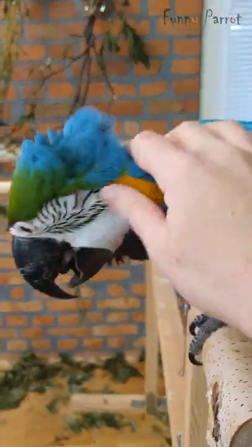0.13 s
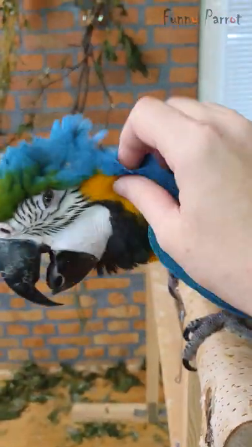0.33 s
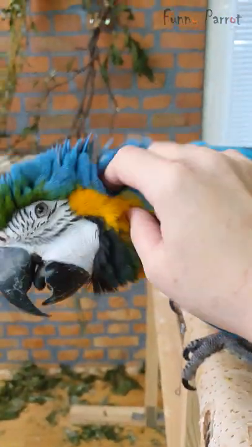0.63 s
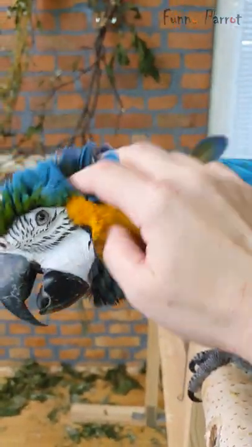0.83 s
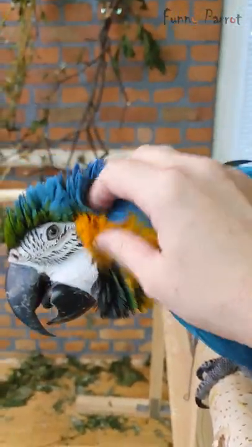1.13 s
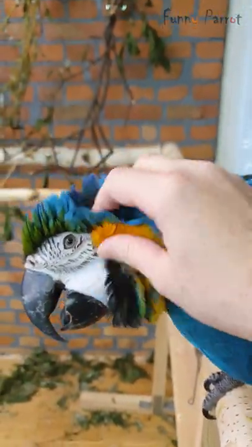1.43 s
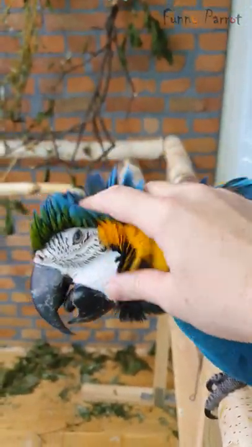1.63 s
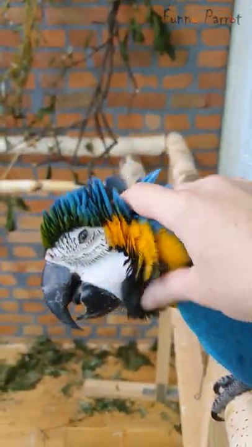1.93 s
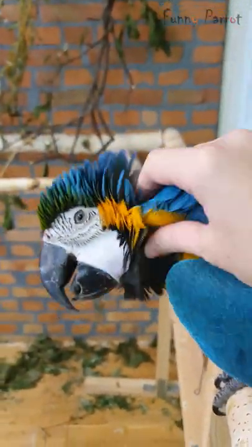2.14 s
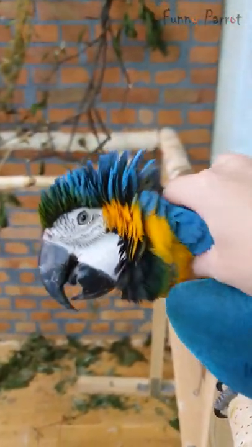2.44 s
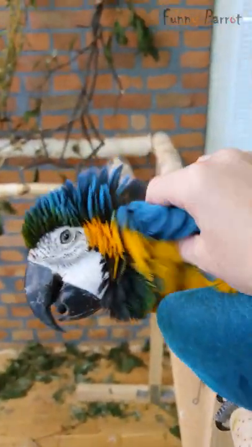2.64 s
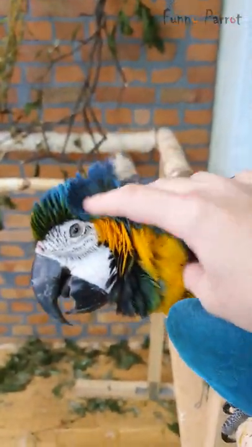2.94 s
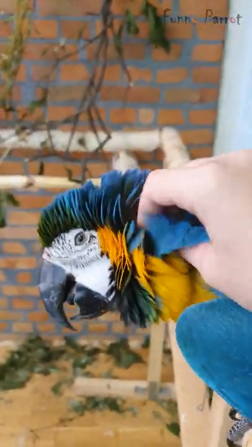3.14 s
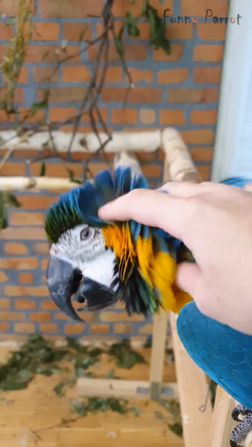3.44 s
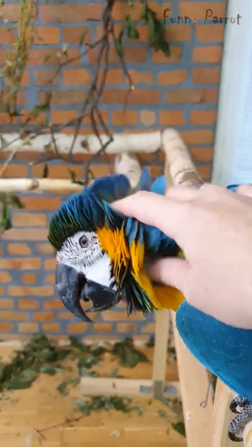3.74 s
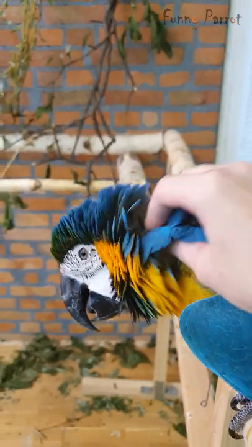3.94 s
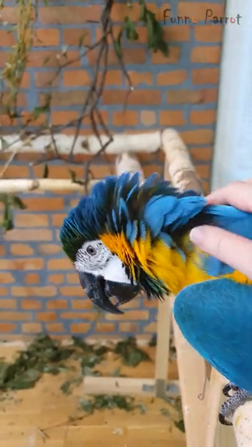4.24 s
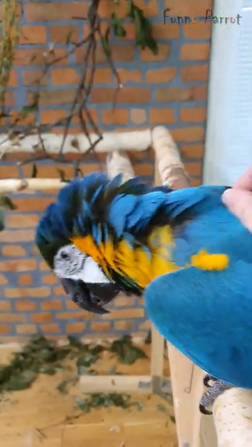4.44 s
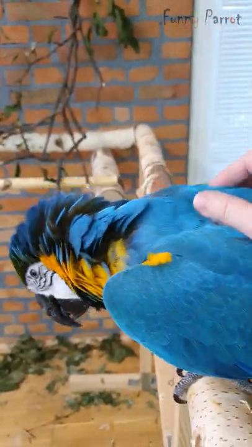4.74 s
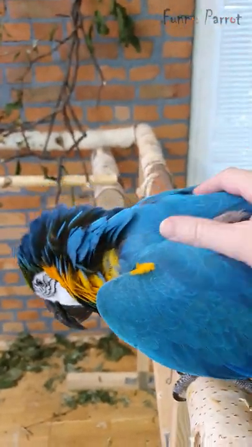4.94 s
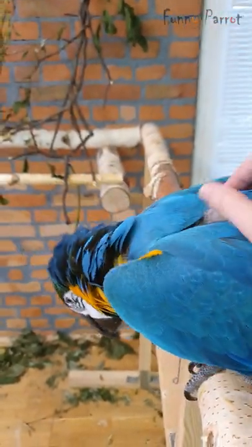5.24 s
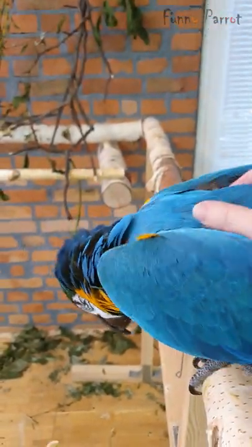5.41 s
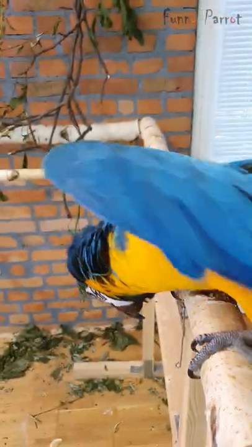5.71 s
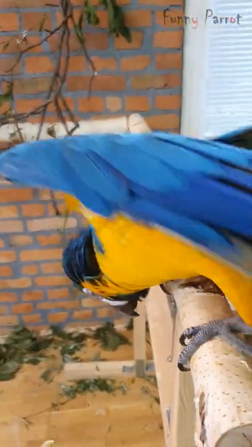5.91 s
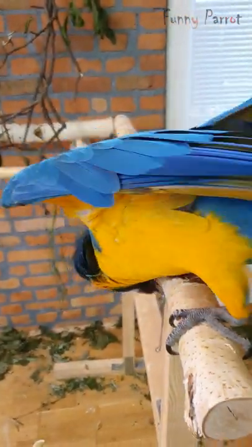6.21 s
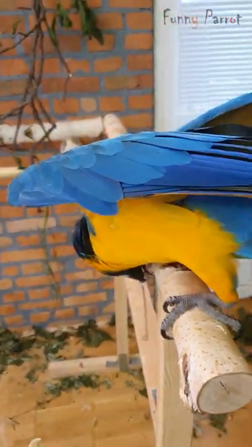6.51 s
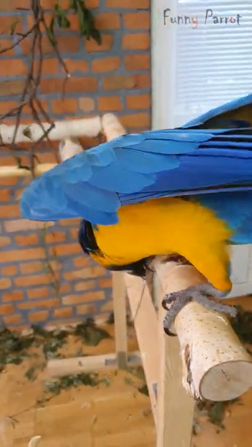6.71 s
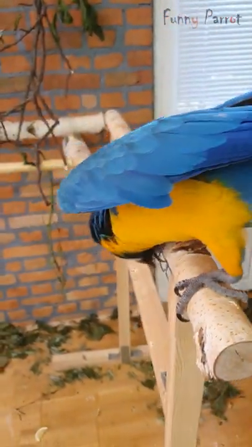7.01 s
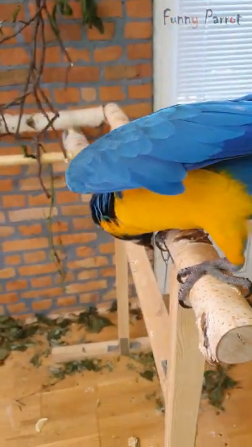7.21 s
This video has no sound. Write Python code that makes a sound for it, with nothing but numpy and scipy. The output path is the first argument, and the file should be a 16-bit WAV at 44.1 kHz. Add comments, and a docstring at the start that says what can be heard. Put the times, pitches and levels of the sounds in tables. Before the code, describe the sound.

Faint feather rubbing in a humming room, one short loud parrot squawk, then wing rustling, dry quill ticks and a brief rasp.

```python
"""Scratching a macaw's neck

Fingers rub a macaw's feathers in a brick-walled room where an appliance hums. The bird's voice box
gives one whistling squawk. It lifts a wing, whose long feathers rustle past each other, and ends on
a short hoarse rasp of air through its throat. Quills tick, beak and claws tap softly, and there is
a dull bump with a low rumble."""
import sys
import numpy as np
from scipy import signal
from scipy.fft import rfft, irfft, next_fast_len
from scipy.io import wavfile
from scipy.ndimage import uniform_filter1d, map_coordinates

SR = 44100
rng = np.random.default_rng(int(sys.argv[2]) if len(sys.argv) > 2 else 0)


def persist_wave(psi):
    """Save psi, clipped to +-1, as 16-bit WAV."""
    counts = np.round(np.clip(psi, -1, 1) * 32767).astype(np.int16)
    wavfile.write(sys.argv[1], SR, np.atleast_2d(counts).T)


N = 324576
TIME_S = np.arange(N) / SR

# tone colour of back feathers, also used for flicks of the wing: frequency_hz, level_db
FEATHER_COLOUR = [(500, -14), (1200, -6), (2200, 3.5), (2900, -2), (4100, 4.5), (6000, -6), (9000, -5),
                  (12000, -8), (16000, -9.5)]


def amp(db):
    """Turn decibels into a gain."""
    return 10 ** (np.asarray(db) / 20)


def unit(x):
    """Scale a signal to an average power of 1."""
    return x / np.sqrt(np.mean(x ** 2) + 1e-20)


def along(points, hz):
    """Read between (frequency_hz, value) points, with octaves evenly spaced."""
    points_hz, values = np.transpose(points)
    return np.interp(np.log(hz + 1), np.log(points_hz + 1), values)


def curve(rows):
    """Join (time_s, value) points with straight lines."""
    return np.interp(TIME_S, *np.transpose(rows))


def during(rows):
    """1 from a table's first time to its last, 0 outside, with soft edges."""
    inside = (TIME_S >= rows[0][0]) & (TIME_S <= rows[-1][0])
    return uniform_filter1d(1. * inside, size=400)


def switch(at_s, ease_s):
    """A smooth step from 0 to 1."""
    return .5 + .5 * np.tanh((TIME_S - at_s) / (2 * ease_s))


def held(start_s, length_s, attack_s, sag_db_per_s, release_db_per_s):
    """A level that rises, sags while it is held, then dies away."""
    t = np.maximum(TIME_S - start_s, 0)
    drop_db = sag_db_per_s * t + release_db_per_s * np.maximum(t - length_s, 0)
    return np.minimum(t / attack_s, 1) ** 2 * amp(-drop_db)


def wobble(rate_hz):
    """A smooth random curve with rate_hz new values a second."""
    values = rng.standard_normal(int(N * rate_hz / SR) + 4)
    return map_coordinates(values, [np.arange(N) * rate_hz / SR])


def phase_of(pitch_hz):
    """The running angle of a wave whose pitch changes."""
    return 2 * np.pi * np.cumsum(pitch_hz) / SR


def add(track, start_s, sound):
    """Mix a sound into a track."""
    part = track[..., round(start_s * SR):][..., :sound.shape[-1]]
    part += sound[..., :part.shape[-1]]


def filtered(x, response):
    """Scale each frequency f in a signal by response(f)."""
    size = next_fast_len(N + SR // 2)
    return irfft(rfft(x, size) * response(np.fft.rfftfreq(size, 1 / SR)), size)[..., :N]


def resonance(f, hz, width_hz):
    """A filter peak of height 1 that favours frequencies near hz."""
    return 1j * f * width_hz / (hz * hz - f * f + 1j * f * width_hz)


def resonant_noise(peaks, flutter_db, flutter_hz):
    """Fluttering noise through (centre_hz, width_hz, level_db) peaks, cut below the lowest."""
    def response(f):
        body = sum((-1) ** k * amp(db) * resonance(f, hz, width)
                   for k, (hz, width, db) in enumerate(peaks))
        return body / (1 + (.8 * peaks[0][0] / (f + 1)) ** 10)
    noise = rng.standard_normal(N) * amp(flutter_db * wobble(flutter_hz))
    return unit(filtered(noise, response))


def spread(pair, gain):
    """Colour two unrelated signals and mix them to stereo, with both sides alike in the bass."""
    # how alike left and right are: frequency_hz, likeness (1 = the same)
    likeness = [(100, 0.94), (350, 0.8), (700, 0.37), (1500, 0.27), (3000, 0.016), (12000, 0.044)]
    angle = lambda f: np.arccos(np.clip(along(likeness, f), -1, 1)) / 2
    mid, side = filtered(pair, lambda f: gain(f) * np.array([np.cos(angle(f)), np.sin(angle(f))]))
    return unit(np.array([mid + side, mid - side]))


def room(x, echo_db, ring=1):
    """Blend a sound with its echo off the hard walls; ring scales the echo's length."""
    # time the echo takes to fall 60 dB at ring=1: frequency_hz, fade_s
    echo_fade = [(200, .45), (1000, .52), (1900, .62), (3600, .72), (6000, .5), (12000, .35)]
    hz, t, noise = signal.stft(rng.standard_normal((2, SR)), SR, nperseg=256)
    fade = amp(-60 * t / (ring * along(echo_fade, hz)[:, None]))
    tail = signal.istft(noise * fade, SR, nperseg=256)[1]
    tail = np.pad(tail / np.linalg.norm(tail[0]), ((0, 0), (SR // 200, 0)))  # arrives 5 ms late
    echo = signal.fftconvolve(x[None], tail, axes=1)[:, :N]
    return (x + amp(echo_db) * echo) / np.hypot(1, amp(echo_db))


def hum_and_air():
    """An appliance hums, slightly unsteady, over the low rush of room air."""
    # the appliance's tones: pitch_hz, level_db
    hum_tones = [(80.7, -72), (118.4, -64), (199.2, -80.5), (301.5, -80), (355.3, -67), (441.4, -76)]
    # tone colour of the air: frequency_hz, level_db
    air_colour = [(18, -45), (30, -29), (109, -2.5), (245, -11.5), (355, -4.5), (404, -15.5), (449, -14.5),
                  (554, -25), (844, -26.5), (1040, -36), (1760, -30.5), (2120, -38), (6380, -35.5),
                  (11400, -42), (16000, -68)]
    hum = sum(amp(db + 1.74 * wobble(9.6)) * unit(np.sin(phase_of(hz + 2.5 * wobble(20))))
              for hz, db in hum_tones)
    air = spread(rng.standard_normal((2, N)), lambda f: amp(along(air_colour, f)))
    return amp(0.5) * hum + amp(-63) * air


def rumble():
    """A deep, wavering tone and its octave come and go."""
    # spells of rumble: start_s, length_s, level_db
    spells = [(0.697, 0.14, -67), (1.16, 0.062, -70), (2.41, .1, -64), (3.092, 0.12, -40.5),
              (3.245, 0.19, -51), (3.412, 0.28, -49), (3.766, 0.26, -56), (4.13, .35, -71.5),
              (5.371, .1, -53), (5.66, .14, -57.5)]
    swell = sum(amp(db) * held(start, length, attack_s=0.049, sag_db_per_s=11.5, release_db_per_s=229)
                for start, length, db in spells)
    phase = phase_of(pitch_hz=41.5 + 2 * wobble(10))
    tone = unit(np.sin(phase) + amp(-14.5 + 2.7 * wobble(9.9)) * np.sin(2 * phase))
    floor = amp(-82 + 4 * wobble(8))
    return np.hypot(swell, floor) * tone  # hypot adds two levels by their power


def bump():
    """A dull, scraping bump swells and fades."""
    # its rise and fall: time_s, level_db
    loudness = [(3.085, -68), (3.11, -58), (3.15, -51), (3.175, -57.5), (3.2, -62), (3.24, -66), (3.3, -77)]
    # its resonances: centre_hz, width_hz, level_db
    peaks = [(197, 14, -1), (520, 45, -9.5), (623, 73, -19), (840, 50, -24)]
    scrape = resonant_noise(peaks, flutter_db=0.5, flutter_hz=44)
    return amp(curve(loudness)) * during(loudness) * scrape


def contacts(rows, attack_s, ring_s, crack_db, crack_s):
    """Each contact is a brief ring and a tiny crack, falling 60 dB in ring_s and crack_s."""
    track, t = np.zeros(N), np.arange(SR // 10) / SR
    for start_s, db, hz in rows:
        ring = np.sin(2 * np.pi * hz * t) * amp(-60 * t / ring_s)
        crack = amp(crack_db - 60 * t / crack_s) * rng.standard_normal(len(t))
        hit = (ring + crack) * (1 - np.exp(-t / attack_s))
        add(track, start_s, amp(db) * hit / np.abs(hit).max())
    return track


def quill_ticks():
    """Quills tick, high and dry."""
    # each tick: start_s, strength_db, pitch_hz
    hits = [(4.798, -34, 7150), (5.763, -37, 4530), (6.1185, -32, 3950), (6.1862, -25.5, 3970),
            (6.2203, -34, 2620), (6.4089, -26.5, 3830), (6.48, -27, 3830), (6.4865, -25, 2980),
            (6.6667, -33, 3200), (6.6996, -28, 3500), (6.7753, -27.5, 3530), (6.8266, -39, 4800),
            (6.9236, -22.5, 3980), (7.003, -31, 3660), (7.0554, -42, 5940), (7.0848, -29.5, 3790),
            (7.1576, -45, 3450), (7.3115, -54, 6540)]
    ticks = contacts(hits, attack_s=0.00041, ring_s=0.0026, crack_db=-8, crack_s=0.0028)
    ticks = filtered(ticks, lambda f: resonance(f, 3370, 4500) ** 2)
    return room(ticks, echo_db=-10)


def beak_and_claw_taps():
    """Beak and claws knock softly, lower than the quills and with more echo."""
    # each tap: start_s, strength_db, pitch_hz
    hits = [(0.242, -44.5, 800), (2.04, -35, 910), (2.589, -40, 880), (3.235, -43, 980), (3.816, -51, 890),
            (4.995, -51.5, 873), (6.488, -26.5, 820), (6.519, -30, 756), (6.754, -37, 825),
            (6.798, -40, 826)]
    taps = contacts(hits, attack_s=0.00052, ring_s=0.019, crack_db=2.5, crack_s=0.014)
    taps = filtered(taps, lambda f: resonance(f, 950, 2100) ** 3)
    return room(taps, echo_db=1.5, ring=0.52)


def barbs(colour, low_hz, high_hz, clicks_per_s, click_db, clump_db):
    """A feather's tiny branches slip past each other: clumps of fine clicks on a smooth swish."""
    clicks = (rng.random(N) < clicks_per_s / SR) * rng.standard_normal((2, N))
    swish = rng.standard_normal((2, N))
    pair = (swish + amp(click_db) * unit(clicks)) * amp(clump_db * wobble(90))
    band = lambda f: 1 / np.sqrt((1 + (low_hz / (f + 1)) ** 8) * (1 + (f / high_hz) ** 8))
    return spread(pair, lambda f: amp(along(colour, f)) * band(f))


def rubs(rows):
    """Each rub swells, then fades more slowly. Gives one gain curve for each level column."""
    roundness, fade_ratio = 1.67, 1.32
    power = np.zeros((len(rows[0]) - 2, N))
    for peak_s, length_s, *levels_db in rows:
        start_s = max(peak_s - 2 * length_s, 0)
        t = np.arange(start_s, peak_s + 2 * length_s * fade_ratio, 1 / SR)
        from_peak = 2 * (t - peak_s) / length_s
        shape = .5 ** (np.maximum(-from_peak, from_peak / fade_ratio) ** roundness)
        add(power, start_s, (amp(levels_db)[:, None] * shape) ** 2)
    return np.sqrt(power)


def neck_scratches():
    """Fingers work through the soft neck feathers, rubbing faintly between scratches."""
    # tone colour of neck feathers: frequency_hz, level_db
    colour = [(350, -32), (600, -4), (894, -4), (1680, -0.5), (1830, -2.5), (2240, -1.5), (3300, -7),
              (7110, -5.5), (8050, -13.5), (11300, -8.5), (16000, -23)]
    # each scratch: peak_s, length_s, swish_db, crisp_db
    scratches = [(.25, 0.093, -74, -76), (.54, 0.099, -74.5, -75.5), (.66, 0.18, -78, -78.5),
                 (.86, .07, -77, -78), (.97, .08, -79, -80), (1.115, .03, -74, -77),
                 (1.195, 0.056, -75.5, -73.5), (1.41, 0.12, -71, -75), (1.57, 0.11, -77.5, -80),
                 (1.77, 0.059, -72, -73), (1.89, 0.072, -74, -73), (1.97, 0.058, -68, -67),
                 (2.05, 0.054, -64.5, -68.5), (2.14, 0.11, -75, -75), (2.277, 0.028, -59, -55.5),
                 (2.32, 0.093, -57.5, -59), (2.6, 0.39, -73, -76), (2.84, 0.18, -74, -79),
                 (3.055, 0.07, -70, -73), (3.14, 0.095, -69.5, -92), (3.35, 0.071, -74.5, -73),
                 (3.51, 0.06, -82, -76.5), (3.765, 0.045, -77.5, -68), (3.88, 0.17, -79, -82),
                 (4.035, 0.048, -78, -72.5)]
    swish_gain, crisp_gain = rubs(scratches)
    fidget = amp(1.5 * wobble(7.5)) * (TIME_S < 4.1)  # until the hand leaves the neck
    swish = barbs(colour, 710, 5100, clicks_per_s=1100, click_db=-8, clump_db=1.5)
    crisp = barbs(colour, 5200, 17000, clicks_per_s=470, click_db=-2, clump_db=2)
    swish *= np.hypot(swish_gain, amp(-86) * fidget)
    crisp *= np.hypot(crisp_gain, amp(-92) * fidget)
    return swish + crisp


def back_strokes():
    """The fingers slide down the feathers of the back."""
    # each stroke: peak_s, length_s, level_db
    strokes = [(4.403, .06, -42), (4.53, 0.1, -47.5), (4.735, 0.052, -55.5), (4.795, 0.053, -52.5),
               (4.935, 0.088, -59), (5.09, .05, -63), (5.17, 0.072, -54.5), (5.315, 0.084, -59),
               (5.49, 0.16, -63)]
    swish = barbs(FEATHER_COLOUR, 470, 16000, clicks_per_s=1500, click_db=-2.5, clump_db=0)
    return rubs(strokes) * swish


def wing_rustle():
    """The long flight feathers fan out and rub while the wing is up, harder with each sweep."""
    # tone colour of wing feathers: frequency_hz, level_db
    colour = [(400, -17), (600, -15.5), (800, -10.5), (1150, -10.5), (1600, -4), (2100, 1.5), (2900, 0),
              (3900, 1.5), (5000, -2), (7000, -8), (8500, -12), (9800, -13), (11400, -12), (16000, -20.5)]
    # each sweep of the wing: peak_s, length_s, flap_db, swish_db, crisp_db
    sweeps = [(5.615, 0.065, -61.5, -47, -46), (5.73, 0.13, -58.5, -67, -55.5),
              (5.875, 0.12, -48, -46.5, -47), (6.015, 0.088, -55.5, -51.5, -53.5),
              (6.18, 0.13, -80, -48.5, -48.5), (6.255, .09, -67, -43, -45.5), (6.34, .12, -64, -41, -48),
              (6.51, 0.077, -57.5, -42.5, -50.5), (6.59, 0.055, -65, -52, -54.5),
              (6.69, 0.065, -59, -50, -55.5)]
    # stiff feathers flicking past each other: peak_s, level_db, width_s, centre_hz
    flicks = [(5.85, -43.5, 0.015, 1880), (5.888, -38.5, 0.009, 5980), (5.89, -39, 0.013, 1630),
              (5.908, -41.5, 0.0083, 3870), (6.246, -41.5, 0.021, 1900)]
    lifted = held(start_s=5.545, length_s=1.174, attack_s=0.063, sag_db_per_s=0, release_db_per_s=68)
    # the crisp top comes and goes faster than the flap and swish
    steady = [amp(-68.5) * lifted, amp(-48.5) * lifted, amp(-53) * lifted ** 2.4]
    flap, swish, crisp = np.hypot(rubs(sweeps), steady)
    rustle = flap * barbs(colour, 400, 1410, clicks_per_s=300, click_db=-6, clump_db=0.5)
    rustle += swish * barbs(colour, 1130, 7000, clicks_per_s=290, click_db=-8.5, clump_db=0.95)
    rustle += crisp * barbs(colour, 7000, 18720, clicks_per_s=680, click_db=-4.5, clump_db=1.5)
    for peak_s, db, width_s, hz in flicks:
        swell = amp(db) * np.exp(-.5 * ((TIME_S - peak_s) / width_s) ** 2)
        octave = hz / np.sqrt(2), hz * np.sqrt(2)
        rustle += swell * barbs(FEATHER_COLOUR, *octave, clicks_per_s=1600, click_db=1.5, clump_db=1)
    return rustle * amp([[-.3], [.3]])


def rasp():
    """Air churns through the bird's throat in a hoarse burst that dulls as it fades."""
    # throat resonances: centre_hz, width_hz, level_db
    throat_peaks = [(2113, 186, 5), (2900, 620, -3.5), (3690, 180, 0), (3896, 124, 2), (4720, 550, -3),
                    (5320, 320, -2.5), (7070, 1300, -9.5)]
    # the deep throat tone's resonances: centre_hz, width_hz, level_db
    deep_peaks = [(1220, 69, -19.5), (1390, 76, 18.5)]
    # when that deep tone breaks through: start_s, length_s, level_db
    deep_pulses = [(6.872, .058, -39.5), (6.975, .06, -49)]
    start_s, length_s, attack_s = 6.846, 0.22, .02
    force = amp(-31) * held(start_s, length_s, attack_s, sag_db_per_s=104, release_db_per_s=227)
    upper = resonant_noise(throat_peaks, flutter_db=1.5, flutter_hz=400)
    upper = filtered(upper, lambda f: 1 / (1 + (f / 12000) ** 6))
    dull = filtered(upper, lambda f: 1 / (1 + (f / 5970) ** 8))
    treble = (upper - dull) * amp(-35 * np.maximum(TIME_S - start_s, 0))  # dies first
    deep = resonant_noise(deep_peaks, flutter_db=2, flutter_hz=180)
    pulses = sum(amp(db) * held(start, length, attack_s, sag_db_per_s=26, release_db_per_s=600)
                 for start, length, db in deep_pulses)
    puff = amp(-19.5) * resonant_noise([(656, 860, 0)], flutter_db=6, flutter_hz=170)
    voice = force * (dull + treble + puff) + np.hypot(pulses, amp(-19) * force) * deep
    return room(voice, echo_db=2, ring=.55)


def diffuse_echo(voice, start_s, end_s, echo_db):
    """Each stretch of the call gets its own echo, blending into a smooth, diffuse tail."""
    times_s = np.linspace(start_s, end_s, 7)
    return sum(room(voice * np.interp(TIME_S, times_s, share), echo_db) for share in np.eye(7))


def squawk():
    """The voice box whistles a note and its octave, brighter with effort and as the beak opens."""
    # the pitch dips, swoops up and settles: time_s, pitch_hz
    melody = [(4.078, 1687), (4.1, 1537), (4.122, 1905), (4.14, 2040), (4.165, 2026), (4.2, 1803),
              (4.245, 1848), (4.285, 1783), (4.37, 1790)]
    # the effort behind the call: time_s, level_db
    effort = [(4.071, -67.5), (4.086, -48), (4.107, -31.5), (4.14, -31.5), (4.18, -20.5), (4.23, -23.5),
              (4.275, -18), (4.345, -30), (4.371, -60)]
    # overtones that give it an edge: multiple_of_pitch, level_db
    overtones = [(3, -16.5), (4, -21.5), (5, -30), (6, -34), (7, -32)]
    # resonances of its hiss: centre_hz, width_hz, level_db
    hiss_peaks = [(429, 220, -1), (2300, 2200, -2.5), (6000, 4000, -3)]
    pitch_hz, level_db = curve(melody), curve(effort)
    octave_db = -4 + 8.5 * amp(level_db - level_db.max()) ** 2
    beak_open = switch(at_s=4.157, ease_s=0.0029)
    edge_db = -20.5 + 15 * beak_open
    # hoarseness shakes the pitch, smears the overtones and adds hiss; it mostly clears midway
    hoarse = .7 - .52 * switch(at_s=4.235, ease_s=0.017)
    phase = phase_of(pitch_hz * (1 + .007 * wobble(75) + 0.024 * hoarse * wobble(700)))
    tone = (np.sin(phase) + amp(octave_db) * np.sin(2 * phase)) * amp(1.9 * wobble(140))
    shaken = phase + 0.44 * hoarse * wobble(900)
    edge = sum(amp(db) * np.sin(multiple * shaken) for multiple, db in overtones)
    edge = filtered(edge, lambda f: 1 + amp(3) * resonance(f, 5950, 620))  # the beak's resonance
    hiss = amp(-25.5) * np.sqrt(hoarse) * resonant_noise(hiss_peaks, flutter_db=2, flutter_hz=300)
    voice = (tone + amp(edge_db) * edge + hiss) * amp(level_db) * during(effort)
    return diffuse_echo(voice, effort[0][0], effort[-1][0], echo_db=7) * amp([[-.7], [.7]])


def scene():
    """Mix bird, hand and room; the [left, right] gains lean slightly to the right."""
    calls = squawk() + rasp()
    touches = neck_scratches() + back_strokes() + wing_rustle() + quill_ticks() + beak_and_claw_taps()
    background = bump() + rumble() + hum_and_air()
    return calls + touches * amp([[-.6], [.6]]) + background * amp([[-.25], [.25]])


def record(dry, top_hz=15900):
    """Cut off the very highest treble."""
    return filtered(dry, lambda f: f < top_hz)


dry = scene()
out = record(dry)
persist_wave(out)
```